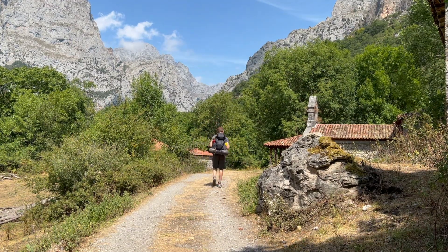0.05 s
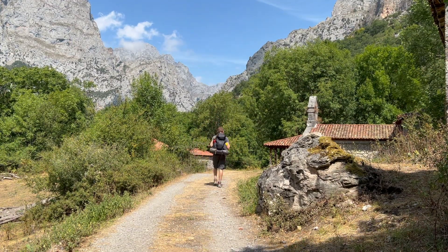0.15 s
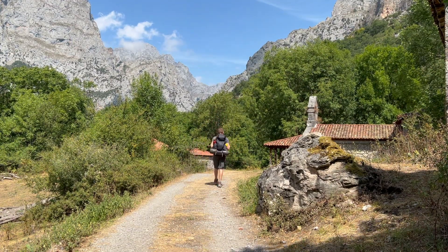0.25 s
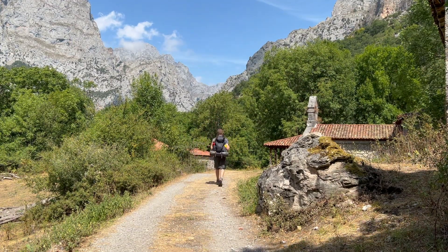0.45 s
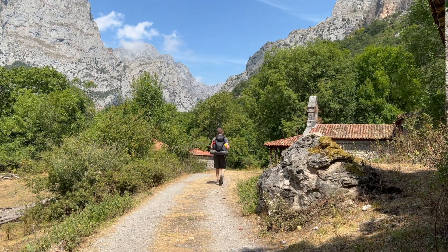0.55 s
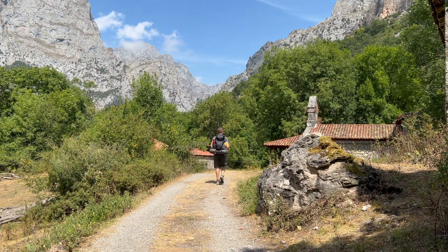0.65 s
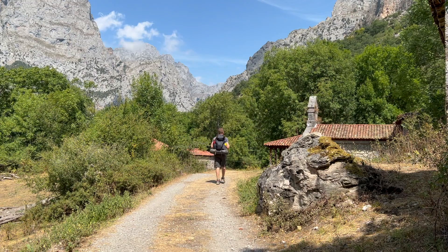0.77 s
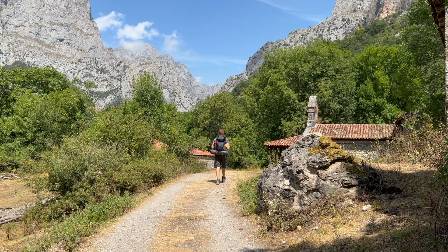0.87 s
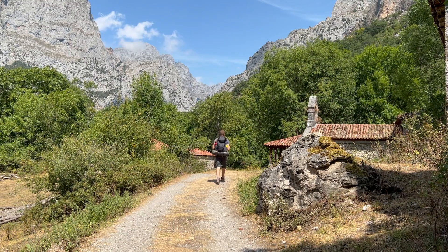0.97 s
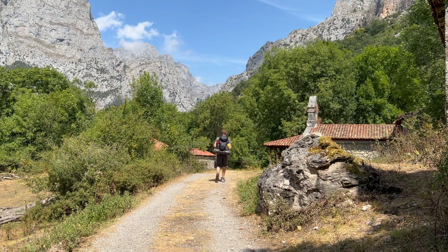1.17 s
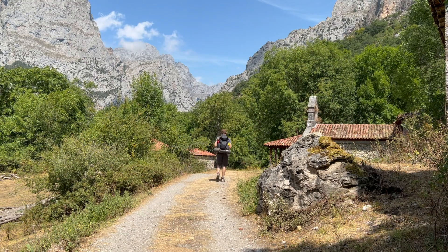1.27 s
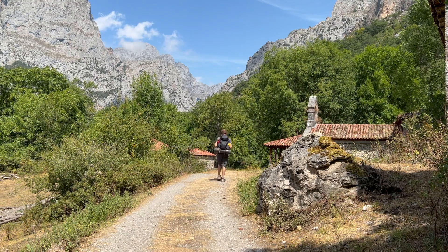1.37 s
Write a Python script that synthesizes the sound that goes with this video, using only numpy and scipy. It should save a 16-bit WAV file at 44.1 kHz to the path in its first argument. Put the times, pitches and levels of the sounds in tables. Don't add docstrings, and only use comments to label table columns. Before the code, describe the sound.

Wind buffeting a microphone outdoors: soft low flutters begin on the left, crowd into a hard thump around half a second, then thin out and weaken, over a quiet, wide, steady hiss of distant tree leaves.

```python
import sys
import numpy as np
from scipy import signal
from scipy.fft import rfft, irfft, next_fast_len
from scipy.io import wavfile
from scipy.ndimage import uniform_filter1d, map_coordinates

SR = 44100
rng = np.random.default_rng(int(sys.argv[2]) if len(sys.argv) > 2 else 0)


def natural_amplitude(level_db):
    exponent = np.asarray(level_db, float) / 20
    return 10 ** exponent


def pcm_store(signal):
    levels = np.round(np.clip(np.atleast_2d(signal), -1, 1) * 32767)
    wavfile.write(sys.argv[1], SR, levels.astype(np.int16).T)


N = 61740
TIME = np.arange(N) / SR
SIDES = np.array([[1], [-1]]) / 2


def unit(x):
    return x / np.sqrt(np.mean(x ** 2) + 1e-20)


def along(points, hz):
    point_hz, value = np.transpose(points)
    return np.interp(np.log(hz + 1), np.log(point_hz + 1), value)


def wobble(rate):
    knots = rng.standard_normal(int(N * rate / SR) + 4)
    return map_coordinates(knots, [np.arange(N) * rate / SR])


def filtered(x, response):
    size = next_fast_len(N + SR // 2)
    hz = np.fft.rfftfreq(size, 1 / SR)
    return irfft(rfft(x, size) * response(hz), size)[..., :N]


def patchy(noise):
    patch_db = 0.7
    spectrum = signal.stft(noise, nperseg=512)[2]
    patches = rng.standard_normal(spectrum.shape[1:])
    patches = uniform_filter1d(patches, size=6, axis=0)
    patches = uniform_filter1d(patches, size=12, axis=1)
    return signal.istft(spectrum * natural_amplitude(patch_db * unit(patches)), nperseg=512)[1][:, :N]


# frequency in Hz, level in dB per Hz.
LEAF_COLOUR = [(150, -6.5), (600, 0), (1200, -4.5), (2200, -12), (5500, -16), (6800, -17.5), (7600, -24),
               (9800, -26.5), (12500, -32.5), (15500, -40.5)]
# frequency in Hz, common share of the power [0-1].
LEAF_COMMON_SHARE = [(600, .85), (1400, .5), (2100, .1), (3300, .28), (5000, .1), (7000, .45), (9100, .45),
                     (9900, .97), (12100, .5), (12550, 1)]
# frequency in Hz, phase lead in radians.
LEAF_LEFT_LEAD = [(550, 2.2), (1400, 2.7), (3300, 8.8), (7200, 12.6), (9800, 9.5), (10700, 9.2),
                  (12500, 6.28), (14400, 6.28), (14700, 4.7), (15700, 4.2)]
# frequency in Hz, left over right in dB.
LEAF_LEFT_LEAN = [(300, 0), (700, 2.5), (2000, 1), (3300, 3), (5500, 9), (7000, 5), (8500, 0)]


def leaves():
    level_db, swell_db, swell_rate = -47, 0.2, 1.9
    noise = patchy(rng.standard_normal((3, N)))

    def colour(hz):
        return natural_amplitude(along(LEAF_COLOUR, hz) + along(LEAF_LEFT_LEAN, hz) * SIDES)

    def share(hz):
        return np.clip(along(LEAF_COMMON_SHARE, hz), 0, 1)

    def lead(hz):
        return np.exp(1j * along(LEAF_LEFT_LEAD, hz) * SIDES)

    common = filtered(noise[0], lambda hz: colour(hz) * np.sqrt(share(hz)) * lead(hz))
    apart = filtered(noise[1:], lambda hz: colour(hz) * np.sqrt(1 - share(hz)))
    return natural_amplitude(level_db + swell_db * wobble(swell_rate)) * unit(common + apart)


# frequency in Hz, level in dB per Hz.
TURBULENCE_COLOUR = [(20, -30), (45, 1.5), (70, -5), (130, -2), (200, -9.5), (330, -19.5), (600, -34),
                     (2000, -120)]


def turbulence(voices):
    return filtered(rng.standard_normal((voices, N)), lambda hz: natural_amplitude(along(TURBULENCE_COLOUR, hz)))


# time in seconds, strength in dB.
GUST_STRENGTH = [(0, -36), (.07, -57), (.09, -45), (.15, -48), (.17, -49), (0.278, -43.5), (.37, -44.5),
                 (.46, -34), (.57, -39), (.72, -43), (.85, -36), (.96, -43), (1.09, -39.5), (1.14, -50),
                 (1.24, -38), (1.31, -63), (1.331, -56), (1.4, -50)]


def rumble():
    level_db, lump_db, lump_rate = -3, -0.5, 25.8
    lumpy = unit(unit(turbulence(1)[0]) * natural_amplitude(lump_db * wobble(lump_rate)))
    seconds, strength_db = np.transpose(GUST_STRENGTH)
    gust = natural_amplitude(np.interp(TIME, seconds, strength_db))
    return gust * natural_amplitude(level_db) * lumpy


# frequency in Hz, level in dB.
PORT_COLOUR = [(30, 3), (100, 0), (250, -6)]


def port_turbulence(wind):
    level_db = -10
    swell = np.sqrt(np.abs(uniform_filter1d(wind ** 2, SR // 30)))
    deepened = filtered(turbulence(2), lambda hz: natural_amplitude(along(PORT_COLOUR, hz)))
    return natural_amplitude(level_db) * swell * unit(deepened)


# middle in seconds, peak level in dB, pitch
# in Hz, length in cycles.
EDDIES = [(.052, -30.5, 64, 1.9), (.172, -29.5, 115, 1.4), (0.203, -24.5, 83, 1.6),
          (.248, -23, 95, 0.78), (0.266, -18.5, 65.6, 0.58), (.299, -25, 130, 0.68),
          (.328, -24.5, 80, 2.1), (0.396, -24.5, 120, 1.7), (.410, -14.5, 148, 1.29),
          (0.432, -20.5, 82, 1.74), (0.477, -21, 102, 1.57), (.491, -20.5, 289, 1.35),
          (0.502, -11, 165, 1.82), (0.521, -11.5, 65.3, 1.6), (0.594, -23.5, 98, 1.1),
          (0.623, -29.5, 84.5, 2), (0.642, -23.5, 109, 0.78), (0.681, -30.5, 96, 2.8),
          (.756, -22, 267, 0.85), (0.766, -27, 94, 1.33), (0.807, -33, 91, 3.2),
          (0.809, -32.5, 332, 1.03), (.882, -28.5, 153, 0.88), (1.001, -29, 147, 0.68),
          (1.066, -34, 71, 3.4), (1.097, -34, 224, 2.4), (1.195, -37.5, 92, 3.2),
          (1.263, -28.5, 71, 2.4), (1.278, -26, 204, 1.12), (1.301, -30.5, 63, 1.53),
          (0.013, -41, 75, 0.94), (0.036, -32.5, 110, 1.9), (.112, -51, 80, 1.5),
               (0.131, -48, 85, 0.67), (0.185, -32, 98, 0.71), (0.23, -34, 70, 1.2),
               (0.369, -30.5, 52.4, 0.85), (0.407, -34.5, 424, 1.6), (.503, -24.5, 494, 1.7),
               (0.532, -40.5, 327, 1.9), (.542, -20, 59.7, 2), (0.732, -33.5, 73, 2),
               (0.791, -31, 230, 1.2), (0.838, -47, 99, 1.1), (.870, -40.5, 380, 2), (.902, -29, 90, 0.97),
               (.925, -31.5, 120.4, 0.48), (0.967, -38.5, 78, 2.4), (1.027, -37.5, 59.4, 0.86),
               (1.037, -38, 295, 1), (1.068, -43, 265, 6), (1.128, -45.5, 192, 2.6), (1.156, -41, 75.5, 1),
               (1.216, -37, 131, 1.3), (1.295, -30, 150, 1.03), (1.345, -48, 75.5, 0.75),
               (1.380, -56, 60, 1.2)]


def eddies():
    sag = 0.12
    overtone_db = -24
    out = np.zeros(N)
    for middle, peak_db, hz, cycles in EDDIES:
        passed = np.clip((TIME - middle) * hz, -4 * cycles, 4 * cycles)
        sagging = (1 - np.exp(-sag * passed)) / sag
        phase = 2 * np.pi * sagging + rng.uniform(0, 2 * np.pi)
        bell = np.exp(-2 * (passed / cycles) ** 2)
        out += natural_amplitude(peak_db) * bell * (np.sin(phase) + natural_amplitude(overtone_db) * np.sin(2 * phase))
    return out


def sweep_over_ports(wind):
    lag_s, top_hz = 0.0002, 704

    def ports(hz):
        lag = np.exp(2j * np.pi * hz * lag_s * SIDES)
        rolloff = 1 / (1 + (hz / top_hz) ** (2 * 5))
        return lag * rolloff

    return filtered(wind, ports)


def buffeting():
    wind = eddies() + rumble()
    return sweep_over_ports(wind) + port_turbulence(wind)


def scene():
    return leaves() + buffeting()


def low_pass(x):
    return signal.sosfilt(signal.butter(12, 15610, fs=SR, output="sos"), x)


def record(dry):
    return low_pass(dry)


dry = scene()
out = record(dry)
pcm_store(out)
```